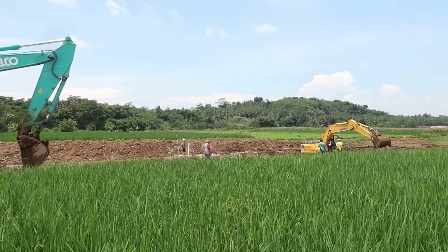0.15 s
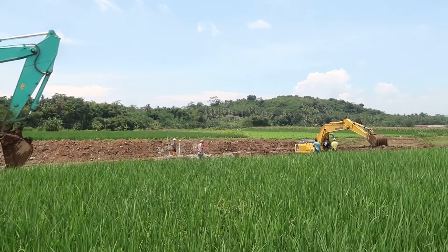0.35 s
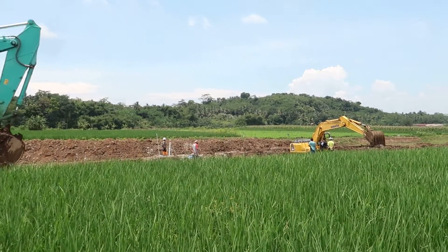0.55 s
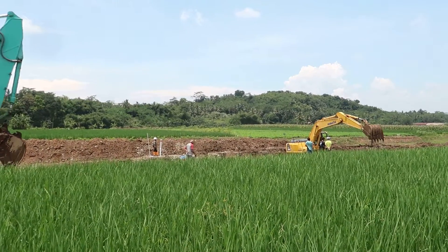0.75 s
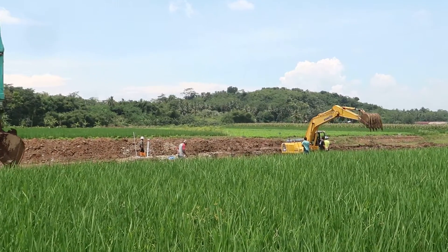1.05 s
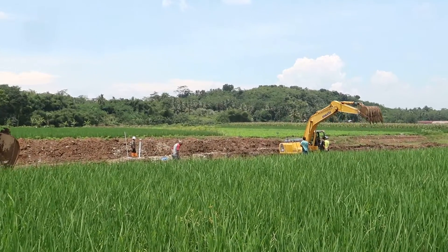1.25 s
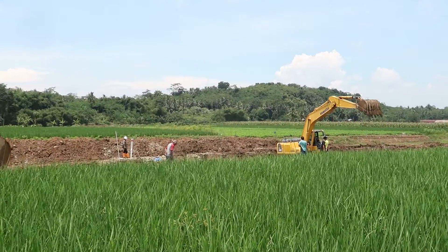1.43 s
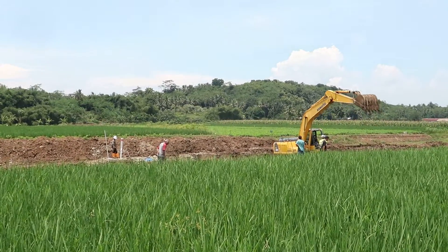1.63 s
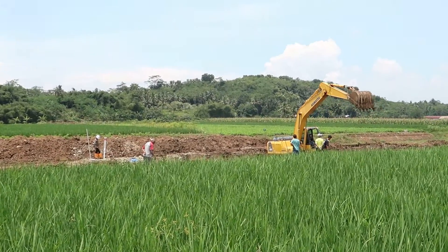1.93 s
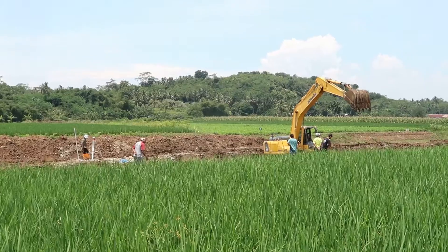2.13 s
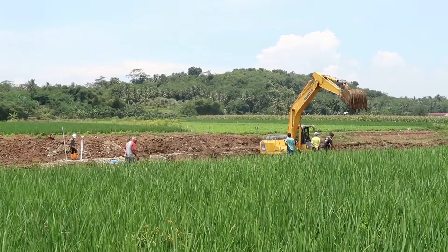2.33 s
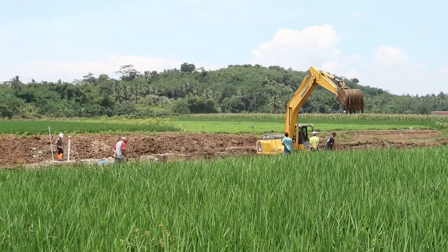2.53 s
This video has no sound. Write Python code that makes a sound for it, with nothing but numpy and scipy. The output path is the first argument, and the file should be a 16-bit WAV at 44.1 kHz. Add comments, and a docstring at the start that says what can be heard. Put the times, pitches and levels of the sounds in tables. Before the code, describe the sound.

Two diesel excavators rumble steadily in an open field, with pump whine, dull thumps and wind puffs.

```python
"""Two diesel excavators work across an open field, both to the left of a small body with two microphone ports.
A four-cylinder and a six-cylinder engine fire unevenly into their exhausts: pulse trains through exhaust colours.
Each drives a nine-piston pump that whines: sines locked to the firings. Fans and casings roar in noise bands,
hood panels ring, oil hisses and a breathy turbo whistle sinks. Bell-shaped noise puffs of wind brush past;
low thumps, short decaying rings, come in a run and then now and again."""
import sys
import numpy as np
from scipy import signal
from scipy.fft import rfft, irfft, next_fast_len
from scipy.io import wavfile
from scipy.ndimage import uniform_filter1d

SR = 44100
rng = np.random.default_rng(int(sys.argv[2]) if len(sys.argv) > 2 else 0)


def master(y):
    """Save y as 16-bit WAV."""
    cut = np.clip(np.atleast_2d(y).T, -1, 1)
    pcm = np.round(cut * 32767)  # scale
    wavfile.write(sys.argv[1], SR, pcm.astype(np.int16))


def invert_db(level):
    """Linear amplitude ratio for a level in decibels (20 dB per decade), elementwise."""
    return 10 ** (np.asarray(level, dtype=float) / 20)


N = 118188
M = next_fast_len(N)
F = np.maximum(np.arange(M // 2 + 1) * SR / M, 1)
T = np.arange(N) / SR

# treble effort gain: none below the first frequency, full above the second
EFFORT_FROM_HZ, EFFORT_FULL_HZ = 990, 3000


def shape(table):
    """Gain over frequency from f/Hz, level/dB points, straight in log f."""
    hz, db = np.array(table, float).T
    return invert_db(np.interp(np.log(F), np.log(hz), db))


def filt(x, gain):
    """Apply a gain over frequency."""
    return irfft(rfft(x, M) * gain, M)[:N]


def level(x, db):
    """Set the rms level."""
    return x * invert_db(db) / np.sqrt(np.mean(x ** 2))


def curves(table):
    """Columns after t/s of a time table, one value a sample."""
    rows = np.array(table, float).T
    return [np.interp(T, rows[0], col) for col in rows[1:]]


def walk(rate_hz):
    """Random levels held 1 / rate_hz and slewed twice; spread near 1."""
    hold = int(SR / rate_hz)
    steps = np.repeat(rng.standard_normal(N // hold + 1), hold)
    slewed = uniform_filter1d(uniform_filter1d(steps, hold), hold)
    return 1.325 * slewed[:N]


def band(hz, width_hz):
    """Noise ringing in one resonance, rms 1."""
    detune = 2 * (F - hz) / width_hz
    return level(filt(rng.standard_normal(N), 1 / (1 + detune ** 2)), 0)


def bands(table, lo_hz, count, effort_db=0, heave_db=0):
    """Half-octave noise bands, rms 1, that swell together, flicker alone and brighten with effort."""
    swell_db, flicker_db, grit_db = 0.94, 1.2, 0.94  # spreads; grit is the fast treble flutter
    heave_below_hz = 400
    spectrum = rfft(rng.standard_normal(M)) * shape(table)
    swell = swell_db * walk(1.1)
    out = 0
    for k in range(count):
        centre_hz = lo_hz * 2 ** (k / 2)
        place = np.clip(2 * np.log2(F / lo_hz), 0, count - 1) - k
        part = irfft(spectrum * np.clip(1 - abs(place), 0, 1), M)[:N]
        share = np.log(centre_hz / EFFORT_FROM_HZ) / np.log(EFFORT_FULL_HZ / EFFORT_FROM_HZ)
        share = np.clip(share, 0, 1)
        heave = (centre_hz < heave_below_hz) * heave_db
        flicker = (1 - 0.76 * share) * flicker_db * walk(8.83)
        treble = share * (effort_db + grit_db * walk(45.26))
        out = out + part * invert_db(swell + heave + flicker + treble)
    return level(out, 0)


def wind():
    """Wind puffs: bell-shaped bursts of noise, each in one soft band."""
    # puffs: t/s of the centre, time to e^-2/s, level at the centre/dB, centre f/Hz, half width at 1/e/octaves
    puffs = [(0.31, 0.037, -26.5, 850, 0.6), (0.357, 0.24, -28.5, 411, 0.33), (0.484, 0.05, -16, 301, 0.72),
             (.485, 0.057, -28, 576, .5), (0.472, 0.046, -22, 997, 0.4), (0.71, 0.026, -22, 364, .4),
             (0.75, 0.13, -25.5, 119.6, 0.36), (1.018, 0.026, -28, 694, 0.82),
             (2.401, 0.012, -17.5, 197, 0.22)]
    out = 0
    for s, length_s, db, hz, octaves in puffs:
        air = filt(rng.standard_normal(N), np.exp(-(np.log2(F / hz) / octaves) ** 2))
        bell = np.exp(-2 * ((T - s) / length_s) ** 2)
        puff = air * bell
        out = out + invert_db(db) * puff * np.sqrt(np.sum(bell ** 2) / np.sum(puff ** 2))
    return out


def thumps():
    """Heavy thumps: short low rings that rise within a cycle and die away."""
    # thumps: t/s of the peak, peak level/dB, f/Hz
    hits = [(.445, -11.5, 170), (.487, -10, 184), (.509, -9.5, 150), (.572, -8.5, 110), (.6, -12, 100),
            (.711, -8, 125), (0.734, -10, 120), (.765, -12, 114), (.79, -10.5, 115), (.812, -13.5, 110),
            (.842, -11, 150), (.861, -12, 140), (.28, -8.5, 119), (1.012, -9.5, 129), (1.199, -10, 110),
            (1.232, -14, 119.4), (1.445, -12.5, 149.4), (1.501, -11, 100), (1.691, -12.5, 150),
            (2.52, -11.5, 113), (2.58, -11.5, 142)]
    rise_cycles = 0.69
    out = 0
    for s, db, hz in hits:
        age = np.maximum((T - s) * hz / rise_cycles + 1, 0)  # 1 at the peak
        out = out + invert_db(db) * age * np.exp(1 - age) * np.cos(2 * np.pi * hz * (T - s))
    return out


def turbo():
    """Turbo whistle: narrow noise carried on a sine that follows the wheel speed."""
    # whistle: t/s, f/Hz, rms level/dB
    whistle = [(0, 12350, -55), (.35, 11800, -60), (.5, 11650, -60.5), (1.0, 11700, -67), (1.3, 10570, -65),
               (1.9, 10540, -64), (2.3, 10730, -56.5), (2.68, 10800, -86)]
    width_hz = 90
    hz, db = curves(whistle)
    carrier = np.sqrt(2) * np.sin(2 * np.pi * np.cumsum(hz) / SR)
    return band(0, width_hz) * carrier * invert_db(db)


def hiss():
    """Oil rushing through the valves: treble noise bands that follow the flow."""
    # colour: f/Hz, relative level per Hz/dB
    colour = [(3000, -13.5), (4400, -9), (6100, -10), (7500, -2.5), (9300, -9), (10700, 0), (12300, -9.5),
              (14000, -9.5), (14800, -21), (15500, -19.5)]
    # oil flow: t/s, level/dB
    flow = [(0, -51), (.3, -52.5), (.48, -56.5), (.53, -47), (.85, -54), (1.0, -50.5), (1.5, -52),
            (2.0, -46.5), (2.35, -52.5), (2.68, -53)]
    return bands(colour, 4000, count=4) * invert_db(curves(flow)[0])


def roar(phase):
    """Fan and casing noise, throbbing a little with the firings, and the hood panels ringing in noise."""
    # fan and casing colour: f/Hz, relative level per Hz/dB
    colour = [(22, -28), (38, -13.5), (55, -12.5), (75, -2), (110, -1), (160, -4.5), (220, -6.5), (320, -8),
              (480, -19), (620, -23.5), (780, -26), (900, -17), (1000, -16), (1200, -17), (1450, -20.5),
              (1750, -20.5), (2030, -23), (2500, -21), (2880, -24), (3200, -33.5), (4400, -36),
              (5200, -36.5), (5800, -42.5), (8000, -50), (12000, -73)]
    # ringing hood panels: f/Hz, width/Hz, level/dB
    panels = [(128.5, 8.9, -30.5), (150.3, 11, -38), (192.6, 6, -28.5), (253, 7.9, -34), (287, 16, -37.5),
              (329.8, 6, -31.5), (360.5, 9.2, -38.5), (688.5, 61, -43), (977, 82, -42), (1586, 40, -44),
              (1791, 43, -40), (1976, 27, -46.5), (2144, 64, -38.5), (2458, 30, -42), (2725, 35, -52),
              (2880, 61, -51.5), (4000, 26, -59.5), (4470, 80, -59), (6000, 80, -69.5)]
    # heave of the low rumble: t/s, relative level/dB
    heave = [(0, -3), (.2, -1.5), (.3, -2.5), (.45, -1.5), (.55, -2.5), (.66, 1), (.85, -0.5), (.9, -6.5),
             (.97, -2.5), (1.03, 0), (1.1, -1.5), (1.25, 0.5), (1.6, -2), (1.75, -2), (2.0, 0), (2.2, 1),
             (2.45, -1), (2.68, -1.5)]
    # effort of the near machine: t/s, relative level of the treble/dB
    effort = [(0, -2.5), (.3, -1.5), (.5, 0), (.65, 2.5), (.85, 0), (1.0, 0), (1.3, 1.5), (1.9, 0),
              (2.2, 0), (2.45, -2), (2.68, -1)]
    roar_db, throb_depth, panel_waver_db = -18, .03, 2.0
    effort_db, heave_db = curves(effort)[0], curves(heave)[0]
    throb = 1 + throb_depth * np.cos(2 * np.pi * phase)
    noise = bands(colour, 42, count=15, effort_db=effort_db, heave_db=heave_db)
    out = level(noise * throb, roar_db)
    for hz, width_hz, db in panels:
        gain_db = db + panel_waver_db * walk(3.4) + (hz > EFFORT_FROM_HZ) * effort_db
        out = out + band(hz, width_hz) * invert_db(gain_db)
    return out


def exhaust(phase, pipe, count):
    """Firings of count cylinders, uneven in time and strength, coloured by the pipe; rms 1."""
    jitter, scatter_db, cylinder_db = .012, 3, 0.4  # jitter in firing intervals
    firing = np.arange(1, int(phase[-1]))
    late, strength = rng.standard_normal((2, len(firing)))
    cylinders = rng.standard_normal(count)
    at = np.interp(firing + jitter * late, phase, np.arange(N)).astype(int)
    pulses = np.zeros(N)
    pulses[at] = invert_db(scatter_db * strength + cylinder_db * cylinders[firing % count])
    return level(filt(pulses, shape(pipe)), 0)


def pump_whine(phase, tones, count, low_db, high_db):
    """Pump on the engine shaft: wavering sines at multiples of its piston rate."""
    pistons, blur_rad, waver_db = 9, .25, 2.1  # pistons a shaft turn; blur per multiple
    piston = 2 * np.pi * phase * pistons / (count / 2)  # count / 2 firings a turn
    out = 0
    for multiple, db in tones:
        load_db = low_db if multiple <= 2 else high_db
        gain = invert_db(db + load_db + waver_db * walk(5))
        angle = multiple * (piston + blur_rad * walk(14)) + 6 * rng.random()
        out = out + np.sqrt(2) * gain * np.sin(angle)
    return out


def engine(course, pipe, tones, count):
    """Exhaust and pump turn on one firing phase, which wanders slightly; returns sound and phase."""
    hz, exhaust_db, low_db, high_db = curves(course)
    phase = np.cumsum(hz * (1 + 0.001 * walk(6.0))) / SR
    whine = pump_whine(phase, tones, count, low_db, high_db)
    return exhaust(phase, pipe, count) * invert_db(exhaust_db) + whine, phase


def six_cylinder():
    """Six-cylinder diesel: three firings a turn, with its pump; returns sound and firing phase."""
    # course: t/s, firing f/Hz, exhaust level/dB, low pump tones level/dB, high pump tones level/dB
    course = [(0, 93.1, -21, -31, -36), (.26, 93.86, -22, -34, -43), (.4, 94.08, -19.5, -51, -48.5),
              (.75, 99.05, -22.5, -55, -60), (1.0, 100.1, -26, -53, -51), (1.55, 100.1, -28, -39.5, -51.5),
              (1.7, 100, -29, -32.5, -47), (1.82, 100.6, -24.5, -31.5, -50), (1.92, 101.5, -28.5, -26, -47),
              (2.2, 99.4, -22.5, -26, -42), (2.32, 97.94, -19.5, -38.5, -48),
              (2.38, 98.05, -19.5, -42, -46), (2.45, 97.5, -22.5, -29, -47), (2.6, 96.4, -20, -34.5, -47),
              (2.68, 97, -23.5, -35, -41)]
    # exhaust colour: f/Hz, relative level/dB
    pipe = [(40, -24.5), (98, 1.5), (197, -10.5), (295, -11), (400, -17.5), (520, -22), (900, -32.5),
            (4000, -78.5)]
    # pump tones: multiple of the piston rate, relative level/dB
    tones = [(1, -6.5), (2, -6.5), (4, -15.5)]
    return engine(course, pipe, tones, count=6)


def four_cylinder():
    """Four-cylinder diesel: two firings a turn, with its pump; returns sound and firing phase."""
    # course: t/s, firing f/Hz, exhaust level/dB, low pump tones level/dB, high pump tones level/dB
    course = [(0, 62.3, -30, -45, -45.5), (.55, 62.73, -20, -51.5, -50), (.63, 62.59, -22.5, -34.5, -33.5),
              (.88, 62.31, -26, -31, -32.5), (1.02, 62.6, -22, -43, -50), (1.15, 63.96, -22.5, -55, -42),
              (1.5, 63.9, -18.5, -51, -37.5), (2.0, 64.05, -22.5, -55.5, -34), (2.3, 64, -20, -49, -39.5),
              (2.68, 64.4, -24, -46, -39.5)]
    # exhaust colour: f/Hz, relative level/dB
    pipe = [(30, -19.5), (63, 6), (128, -18), (192, -5.5), (256, -8.5), (320, -10.5), (450, -26.5),
            (900, -42.5), (4000, -89)]
    # pump tones: multiple of the piston rate, relative level/dB
    tones = [(1, 3.5), (2, -2.5), (4, 1.5), (6, -2.5)]
    return engine(course, pipe, tones, count=4)


def ports(left, scattered):
    """Sound reaches the left port first; the body colours the right, which adds noise scattered by the field."""
    # shading of the right port by the body: f/Hz, gain/dB
    shade = [(200, 0), (500, -1.3), (800, -1.5), (1200, -3.5), (1600, -5.5), (2800, -6), (4000, -5),
             (7000, -5), (9000, 4)]
    # scattered noise at the right port alone: f/Hz, gain/dB
    diffuse = [(30, -58), (100, -44.5), (250, -21.5), (500, -20), (1000, -24.5), (2000, -9.5), (3300, -1),
               (5000, -4), (8000, 3), (12000, -2.5)]
    lead_s = 56e-6
    right = filt(left, shape(shade) * np.exp(-2j * np.pi * F * lead_s))
    return np.array([left, right + filt(scattered, shape(diffuse) * shape(shade))])


def scene():
    """Both machines, wind and thumps at the two ports."""
    four, phase = four_cylinder()
    six, _ = six_cylinder()
    left = four + six + roar(phase) + hiss() + turbo() + wind() + thumps()
    scattered = roar(phase) + hiss()  # fresh noise
    return ports(left, scattered)


def band_limit(x):
    """A steep low-pass at the top of the band."""
    return signal.sosfilt(signal.butter(12, 15600, fs=SR, output="sos"), x)


def record(dry):
    """Soft overload and low cut; in the top octave only the difference between the ports is kept."""
    ceiling, low_cut_hz, mid_top_hz = 1.3, 40, 8300
    soft = ceiling * np.tanh(dry / ceiling)
    left, right = signal.sosfilt(signal.butter(1, low_cut_hz, "high", fs=SR, output="sos"), soft)
    mid = filt((left + right) / 2, 1 / (1 + (F / mid_top_hz) ** 12))
    side = (left - right) / 2
    return band_limit(np.array([mid + side, mid - side]))


dry = scene()
out = record(dry)
master(out)
```